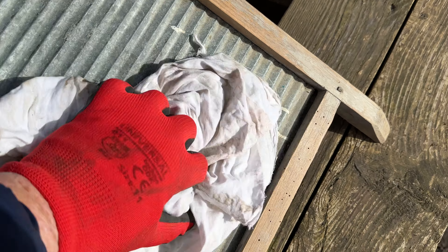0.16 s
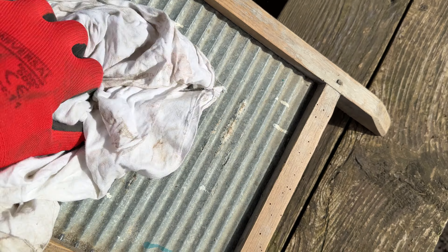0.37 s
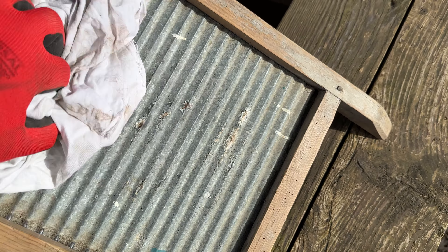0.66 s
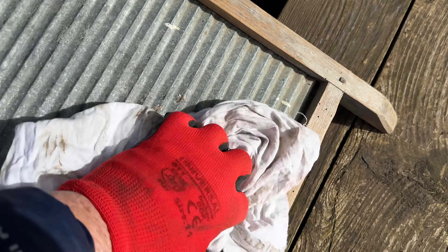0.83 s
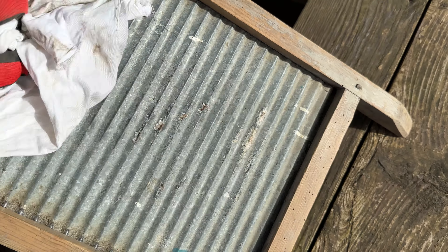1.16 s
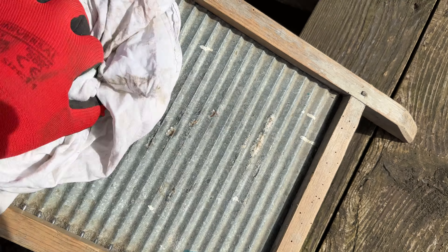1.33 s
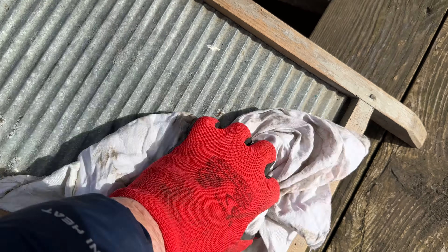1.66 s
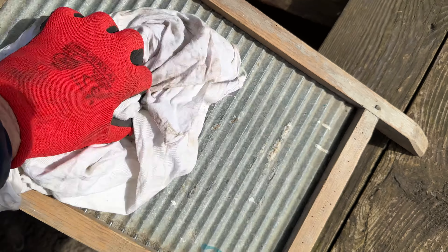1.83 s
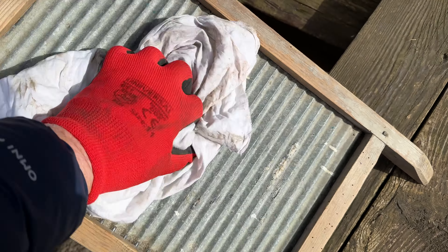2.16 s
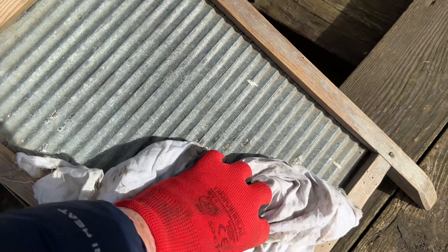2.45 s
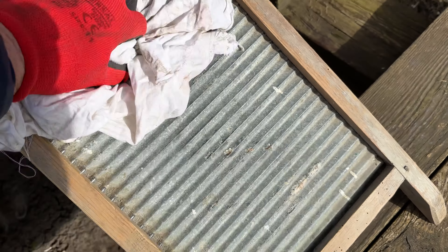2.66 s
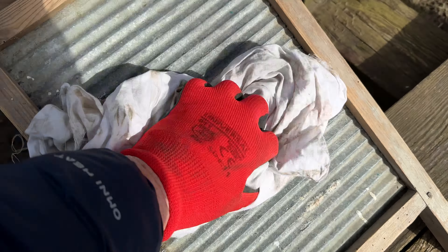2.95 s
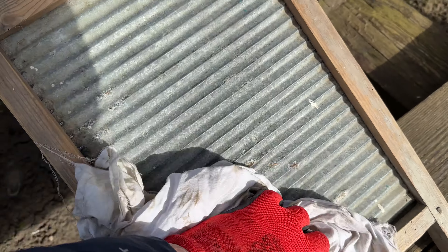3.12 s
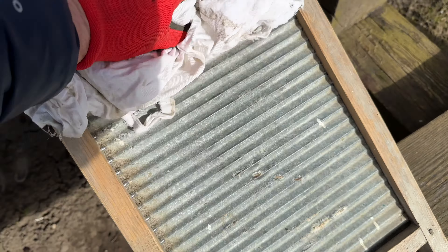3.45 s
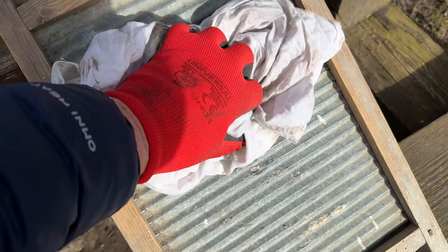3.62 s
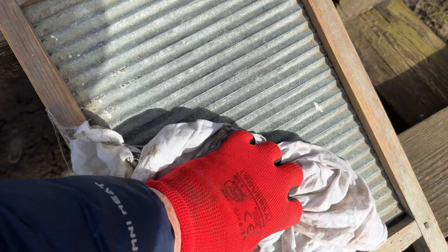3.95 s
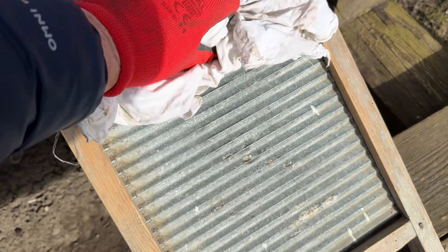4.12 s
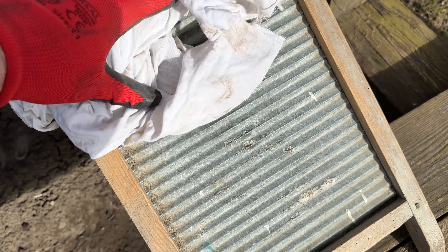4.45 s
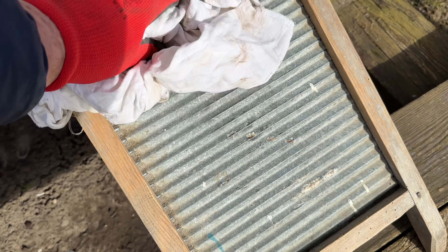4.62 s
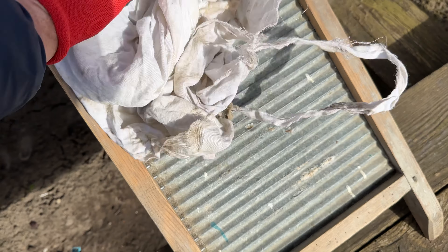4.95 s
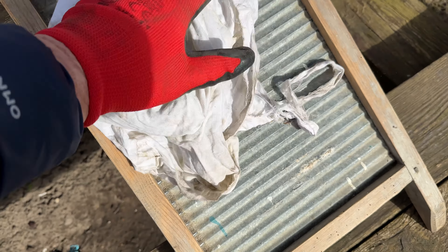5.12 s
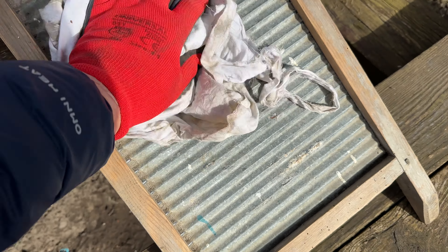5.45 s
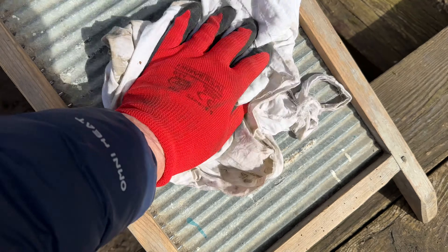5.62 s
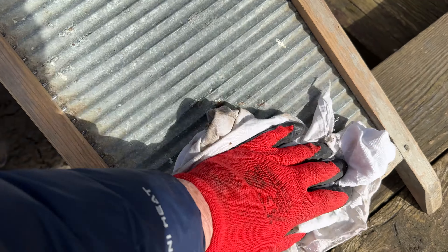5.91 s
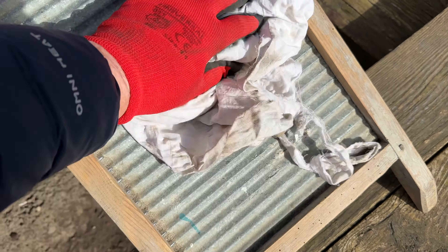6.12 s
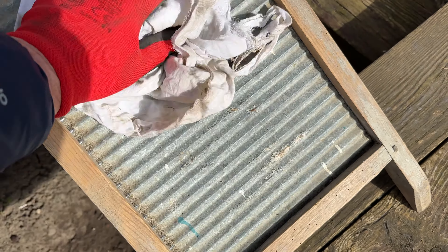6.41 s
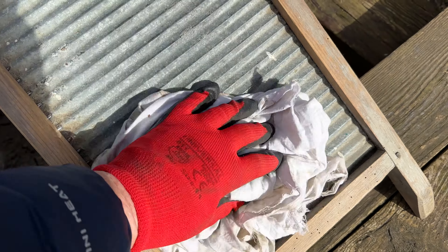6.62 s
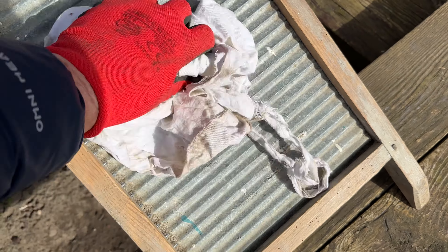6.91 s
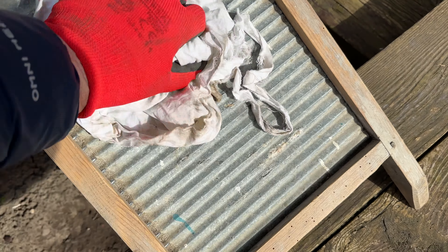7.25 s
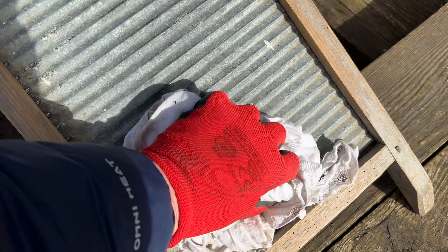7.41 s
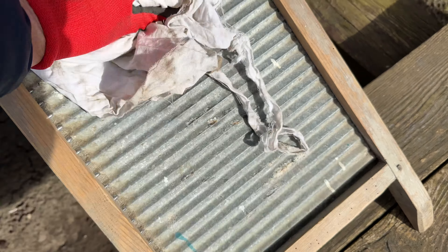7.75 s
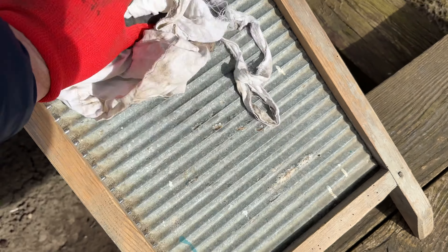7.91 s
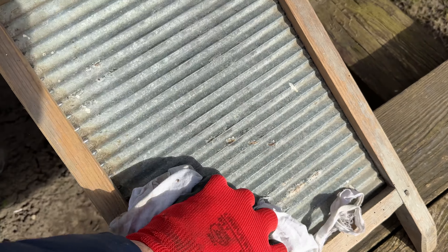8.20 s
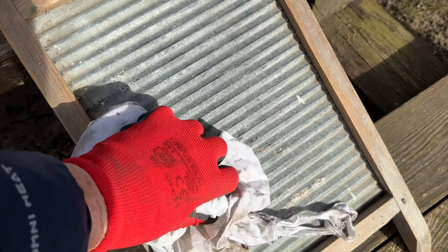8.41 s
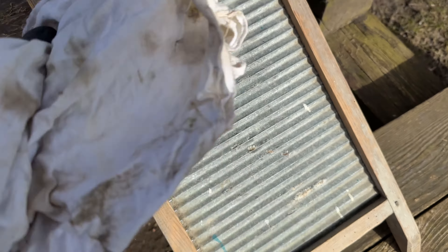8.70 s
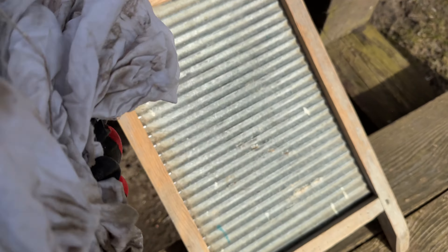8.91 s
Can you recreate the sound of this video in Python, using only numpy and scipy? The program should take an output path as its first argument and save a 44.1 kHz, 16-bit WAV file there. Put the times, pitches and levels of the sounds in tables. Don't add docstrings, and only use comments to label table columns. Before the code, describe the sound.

Outdoors, close to the board, a gloved hand scrubs cloth along corrugated metal in quick alternating strokes, about three a second. Each stroke hisses and purrs over the ridges, with sheet rattles, sharp knocks and low wooden thuds. Midway the rubbing stops for soft flaps and one heavy slap, then scrubbing resumes with small hem ticks and finally fades into quiet air.

```python
import sys
import numpy as np
from scipy import signal
from scipy.fft import rfft, irfft
from scipy.io import wavfile
from scipy.ndimage import uniform_filter1d

SR = 44100
rng = np.random.default_rng(int(sys.argv[2]) if len(sys.argv) > 2 else 0)


def to_wav(sig):
    pcm = np.clip(np.atleast_2d(sig), -1, 1) * 32767
    pcm = np.round(pcm).astype(np.int16)
    wavfile.write(sys.argv[1], SR, pcm.T)


def decibels_to_gain(level_db):
    exponent = np.asarray(level_db, float) / 20
    return 10 ** exponent


N = 399987
T = np.arange(N) / SR

# (start [s], length [s], fibre hiss at mid-stroke [dB], growth over the stroke [dB])
STROKES = [(-0.02, 0.279, -46.9, 2.3), (0.271, 0.283, -50.0, 3.1), (0.55, 0.378, -50.0, 1.1),
           (0.942, 0.312, -50.7, -4.9), (1.284, 0.346, -50.1, 0.6), (1.658, 0.352, -53.6, -3.0),
           (2.034, 0.377, -53.2, 3.7), (2.431, 0.334, -52.8, -0.3), (2.765, 0.377, -51.0, 13.8),
           (3.137, 0.372, -53.3, -2.3), (3.511, 0.391, -52.5, 13.1), (3.915, 0.554, -60.0, -30.1),
           (5.37, 0.56, -49.8, 12.2), (5.937, 0.387, -48.2, 4.8), (6.302, 0.477, -47.1, 3.2),
           (6.756, 0.43, -51.7, -19.6), (7.154, 0.349, -47.5, -0.8), (7.526, 0.362, -47.1, -4.0),
           (7.866, 0.391, -47.1, 6.7)]
# (start [s], length [s], fibre hiss at mid-move [dB], growth over the move [dB])
FOLDS = [(4.363, 0.154, -66.2, -4.1), (4.498, 0.238, -58.7, -26.3), (4.649, 0.336, -59.6, -29.3),
         (4.893, 0.11, -47.0, -16.0), (4.92, 0.434, -63.9, -20.2), (5.21, 0.185, -61.7, 15.6),
         (5.411, 0.055, -53.0, -10.0), (6.335, 0.043, -48.9, -37.2), (8.243, 0.181, -66.0, 21.0),
         (8.38, 0.194, -65.5, 11.2), (8.553, 0.166, -54.1, 1.4), (8.7, 0.18, -66.8, -10.4)]
# (peak [s], rise [s per 20 dB], fall [s per 20 dB], sheet rattle
# [dB], frame rumble [dB])
LEANS = [(0.084, 0.026, 0.144, -27.0, -27.3), (0.462, 0.11, 0.154, -63.8, -37.4),
         (0.702, 0.011, 0.093, -33.3, -26.5), (0.886, 0.187, 0.181, -47.5, -39.5),
         (1.054, 0.085, 0.059, -46.6, -42.3), (1.401, 0.017, 0.236, -30.8, -28.9),
         (1.53, 0.247, 0.088, -52.0, -30.2), (1.861, 0.358, 0.051, -50.7, -46.4),
         (2.276, 0.104, 0.135, -37.5, -31.6), (2.56, 0.082, 0.356, -50.3, -44.4),
         (2.9, 0.008, 0.16, -40.9, -50.8), (3.042, 0.371, 0.209, -47.9, -37.0),
         (3.351, 0.406, 0.317, -50.6, -44.6), (3.73, 0.054, 0.266, -48.0, -38.6),
         (4.123, 0.383, 0.223, -52.7, -51.2), (5.862, 0.344, 0.071, -45.6, -40.5),
         (6.051, 0.199, 0.127, -52.4, -36.8), (6.209, 0.179, 0.115, -32.6, -32.6),
         (6.568, 0.036, 0.286, -45.6, -37.4), (6.877, 0.108, 0.199, -43.8, -40.3),
         (6.974, 0.009, 0.128, -30.6, -31.1), (7.246, 0.021, 0.175, -29.4, -28.3),
         (7.724, 0.221, 0.102, -36.5, -35.6), (8.07, 0.061, 0.155, -30.2, -28.5),
         (0.388, 0.056, 0.1, -60.4, -45.5), (1.669, 0.059, 0.028, -62.7, -44.5),
        (4.441, 0.321, 0.384, -56.9, -51.5), (4.719, 0.122, 0.108, -58.1, -55.1),
        (4.85, 0.043, 0.05, -51.4, -25.2), (4.912, 0.016, 0.116, -28.0, -36.6),
        (5.14, 0.024, 0.174, -49.7, -56.0), (5.251, 0.023, 0.038, -60.0, -46.9),
        (5.442, 0.021, 0.09, -65.4, -49.0), (6.36, 0.029, 0.052, -46.6, -48.8),
        (7.567, 0.052, 0.107, -53.3, -43.8), (8.282, 0.134, 0.031, -65.9, -48.0),
        (8.369, 0.067, 0.162, -56.0, -56.9), (8.911, 0.043, 0.135, -72.0, -44.4),
        (9.008, 0.105, 0.098, -80.0, -53.6)]
# (time [s], rate [ridges per s], unevenness [0-1])
RIDGES = [(0, 70, .74), (1.0, 58, .8), (1.5, 64, .73), (1.75, 54, .72), (2.15, 69, .6), (2.27, 80, .39),
          (2.46, 67, .72), (4.4, 58, .78), (4.85, 73, .73), (5.2, 60, .82), (5.96, 83, .76),
          (6.93, 56, .72), (7.36, 70, .75), (8.44, 57, .77), (9.07, 66, .72)]
# (time [s], peak [dB], brightness [dB])
KNOCKS = [(.064, -14.5, -13), (.079, -20, -14), (.094, -13, -11), (.109, -22, -9.5), (.691, -20, -18),
          (.709, -22, -24), (1.385, -14, -16), (1.402, -13, -21), (1.419, -27, -13), (1.467, -18, -16),
          (2.896, -23.5, -14), (2.91, -18, -29), (4.902, -12.5, -22), (4.917, -17, -12), (4.932, -14, -8),
          (4.954, -17, -13), (6.149, -24, -14), (6.174, -18, -24), (6.217, -19, -22), (6.971, -18.5, -16),
          (7.238, -20, -28), (7.255, -17, -18.5), (7.271, -21, -9.5), (7.286, -12, -24), (7.537, -44, -4),
          (7.688, -19, -19), (8.06, -30, -4), (8.074, -26, -7.5), (8.088, -15, -12.5), (8.183, -26.5, -8)]
# (time [s], peak [dB], pitch [Hz])
THUDS = [(0.075, -22, 126.8), (0.379, -34, 78.1), (0.446, -27, 69.5), (0.53, -29.5, 94),
         (0.82, -25.5, 83.4), (0.965, -30, 78.6), (1.044, -28, 80.7), (1.431, -29, 127), (1.583, -24, 108),
         (1.639, -24.5, 90), (1.732, -38, 97), (2.833, -26.5, 72.8), (3.223, -28, 79.6), (3.725, -33, 69.6),
         (3.938, -29.5, 67.7), (4.837, -23, 145), (4.862, -25, 120.5), (5.433, -40, 78.1),
         (6.029, -26, 138), (6.054, -27, 80.5), (6.171, -33, 78.8), (6.562, -31, 124.3),
         (6.978, -26, 118.7), (7.245, -27, 121.6), (7.615, -31, 99.45), (8.05, -26, 128.3),
         (8.259, -29.5, 86.1), (8.339, -28, 100.3), (8.859, -40.5, 74.8), (9.024, -27.5, 78.6)]
# (time [s], peak [dB], centre [Hz], width [Hz], hold [s])
SNAPS = [
    (4.508, -47.5, 1472, 797, 0.052),
    (4.504, -51, 3290, 700, 0.064),
    (4.902, -25.5, 359.8, 200, 0.031),
    (4.915, -30, 1672, 600, 0.034),
    (5.414, -52.5, 2700, 600, 0.034),
    (5.416, -49, 4970, 3970, 0.029),
    (6.335, -41, 4850, 5010, .018),
    (6.373, -48.5, 2914, 700, .06),
    (8.208, -47.5, 1897, 793, 0.047),
    (8.204, -50, 3400, 900, .048),
]
# (first tick [s], last tick [s], first gap [ms], last gap [ms], level [dB], centre [Hz])
HEM = [
    (6.446, 6.695, 16.8, 14.3, -38, 2840),
    (6.822, 6.92, 11, 9.6, -41.5, 3897),
    (7.593, 7.7, 14.8, 13.3, -34, 1998),
]
# (time [s], topmost band against the hiss [dB])
SHINE = [
    (0, 1.5),
    (4.16, 1.5),
    (4.28, 0),
    (4.9, -7),
    (5.28, -2),
    (5.48, 0.5),
    (6.9, 0.5),
    (8.22, 1.5),
    (8.32, -4.5),
    (9.07, -4),
]
# (frequency [Hz], density [dB per Hz])
HISS = [(150, -24), (250, -5), (547, -5.5), (651, -5), (802, -6.5), (1080, -5.5), (1220, -6.5),
        (1760, -8.5), (3230, -10), (3910, -9.5), (6470, -13.5), (9490, -10), (11300, -22), (15200, -13),
        (16000, -18)]
# (centre [Hz], width [Hz], level [dB])
ZINC = [(628, 45, 0), (3810, 130, -7), (4960, 170, -9), (5910, 150, -10), (6740, 360, -10), (7620, 45, -11)]
# (frequency [Hz], density [dB per Hz])
RATTLE = [(180, -40.5), (300, -4), (734, -2), (1130, -1), (1360, -10), (1660, -9), (2410, -13), (2730, -13),
          (3180, -19), (3770, -17.5), (4610, -24.5), (12000, -58), (15600, -32), (22000, -120)]
# (centre [Hz], width [Hz], level [dB])
SHEET = [(673, 410, 0), (1147, 15, -4), (1717, 330, -8), (2670, 150, -9), (3240, 21, -15), (3610, 150, -14),
         (4500, 38, -20), (4630, 54, -22), (4830, 180, -21), (5600, 31, -24), (5910, 390, -23)]
# (frequency [Hz], density [dB per Hz])
RUMBLE = [(15, -26), (25, -25), (49, -10.5), (70, 0), (92, -4), (124, -3.5), (170, -4.5), (235, -11.5),
          (307, -22), (500, -18), (650, -60), (1100, -120)]
# (frequency [Hz], density [dB per Hz])
AIR = [(24, -26), (40, -4), (95, 8), (233, -6), (340, 1.5), (461, -12), (1000, -13), (1680, -6),
       (2030, -11), (9330, -17.5), (11000, -27), (14300, -58), (22000, -120)]

AIR_DB = -62
LULL_S, LULL_LENGTH_S, LULL_DB = 8.85, .15, -6
STROKE_POWER, FOLD_POWER, STILL_DB = .83, .56, -80
GLIDE_RATTLE_DB, GLIDE_RUMBLE_DB, FOLD_RUMBLE_DB = -0.9, -3.5, -12
FRAME_LAG_S, FRAME_RISE_S, FRAME_FALL = .01, .026, 1.1
SLOW_DB, SHEET_STILLS, FRAME_STILLS = -56.4, .28, .26
KNOCK_T60_S = .049


def noise():
    return rng.standard_normal(N)


def level(x, db):
    return x * decibels_to_gain(db) / np.sqrt(np.mean(x ** 2))


def colour(x, points):
    size = 8192
    hz, db = np.transpose(points)
    bins_hz = np.arange(size // 2 + 1) * SR / size
    gain = np.interp(np.log(bins_hz + 1), np.log(hz), db) * np.log(10) / 20
    cep = irfft(gain)
    cep[1:size // 2] *= 2
    cep[size // 2 + 1:] = 0
    impulse = irfft(np.exp(rfft(cep)))[:size // 2]
    return signal.fftconvolve(x, impulse)[:N]


def ring(x, hz, width):
    return signal.lfilter(*signal.iirpeak(hz, hz / width, SR), x)


def walk(rate):
    k = int(SR / rate)
    steps = np.repeat(rng.standard_normal(N // k + 1), k)
    return 1.3 * uniform_filter1d(uniform_filter1d(steps, k), k)[:N]


def along(table):
    s, *columns = np.transpose(table)
    return [np.interp(T, s, c) for c in columns]


def bursts(times, db, t60):
    out, t = np.zeros(N + SR), T[:SR // 4]
    for s, gain, ring_s in zip(times, decibels_to_gain(db), t60):
        i = int(s * SR)
        out[i:i + len(t)] += gain * np.exp(-np.log(1000) * t / max(ring_s, .01))
    return out[:N]


def add_db(*levels):
    return 10 * np.log10(sum(decibels_to_gain(2 * db) for db in levels))


def air():
    lull_db = LULL_DB * np.clip((T - LULL_S) / LULL_LENGTH_S, 0, 1)
    return level(colour(noise(), AIR), AIR_DB) * decibels_to_gain(0.84 * walk(1.5) + lull_db)


def sliding(moves, power):
    total = decibels_to_gain(2 * STILL_DB)
    for s, length, db, growth_db in moves:
        share = np.clip((T - s) / length, 0, 1)
        speed = np.abs(np.sin(np.pi * share))
        total = total + decibels_to_gain(2 * (db + growth_db * (share - .5))) * speed ** (2 * power)
    return 10 * np.log10(total)


def ridges():
    hz, uneven = along(RIDGES)
    uneven = np.clip(uneven, 0, 1)
    turns = np.cumsum(hz * np.exp(.25 * uneven ** 2 * walk(45))) / SR
    bump_db = 2.4 * uneven * rng.standard_normal(N // 100)[turns.astype(int)]
    return turns % 1, bump_db, uneven


def fibres(phase, db):
    ticks = (rng.random(N) < 1500 / SR) * decibels_to_gain(1.0 * rng.exponential(size=N)) * noise()
    x = colour(noise() + level(ticks, -9), HISS) * (1 + 0.12 * np.exp(-phase / .3))
    x = x + decibels_to_gain(-6.0) * sum(ring(x, hz, width) * decibels_to_gain(2.7 * walk(9)) for hz, width, _ in ZINC)
    patches_hz = np.geomspace(500, 15000, num=20)
    x = x + sum(ring(x, hz, 0.14 * hz) * (decibels_to_gain(2.23 * walk(22)) - 1) for hz in patches_hz)
    low = signal.sosfiltfilt(signal.butter(1, 2600, fs=SR, output="sos"), x)
    top = signal.sosfiltfilt(signal.butter(4, 11800, "high", fs=SR, output="sos"), x)
    shine_db = along(SHINE)[0]
    top_db = shine_db + 0.1 * (db + 53) + 1.1 * walk(5.6)
    low_db = .4 * shine_db + 1.4 * walk(14)
    x = x + low * (decibels_to_gain(low_db) - 1) + top * (decibels_to_gain(top_db) - 1)
    return level(x, 2.3) * decibels_to_gain(0.88 * (db + 57) - 54 + 1.0 * walk(30))


def leaning():
    def tent(s, rise, fall, db):
        return db - 20 * np.maximum((s - T) / rise, (T - s) / fall)

    rattles, rumbles = [], []
    for s, rise, fall, rattle_db, rumble_db in LEANS:
        rattles.append(tent(s, rise, fall, rattle_db))
        slow_rise = np.hypot(rise, FRAME_RISE_S)
        rumbles.append(tent(s + FRAME_LAG_S, slow_rise, FRAME_FALL * fall, rumble_db))
    return add_db(*rattles), add_db(*rumbles)


def sheet(x, ring_db):
    x = colour(x, RATTLE)
    modes = sum(decibels_to_gain(0.17 * db) * ring(x, hz, 0.39 * width) for hz, width, db in SHEET)
    return x + decibels_to_gain(ring_db) * modes


def rattle(phase, bump_db, db, hiss_db):
    shake = noise() * decibels_to_gain(bump_db) * (0.58 + np.exp(-phase / 0.54))
    over = np.sqrt(np.clip(decibels_to_gain(2 * db) - decibels_to_gain(2 * (hiss_db - 1.0)), 1e-12, 1))
    return level(sheet(shake, 1.5), -0.43) * over


def frame(phase, bump_db, uneven, db):
    push = colour(decibels_to_gain(0.37 * bump_db) * np.exp(-phase / 0.079), RUMBLE)
    blur = colour(noise() * decibels_to_gain(3.5 * walk(25)), RUMBLE)
    share = np.clip(1.07 * uneven - .2, 0, 1)
    out = decibels_to_gain(db) * (np.sqrt(1 - share) * level(push, -0.34) + np.sqrt(share) * level(blur, -0.18))
    t = T[:SR // 10]
    swing = t / 0.0049 * np.exp(1 - t / 0.0054)
    for s, peak_db, hz in THUDS:
        i = int(s * SR)
        overtone = 0.2 * np.sin(2 * np.pi * 2.29 * hz * t) * np.exp(-t / 0.016)
        thud = decibels_to_gain(peak_db - 4.0) * (np.sin(2 * np.pi * hz * t) + overtone) * swing
        out[i:i + len(t)] += thud[:N - i]
    return out


def knocks():
    s, db, bright_db = np.transpose(KNOCKS)
    t60 = np.full(len(s), KNOCK_T60_S)
    grit = np.sign(noise())
    unit = np.std(sheet(grit, 11.2))
    grit[(s * SR).astype(int)] = 8.6
    dull = sheet(grit * bursts(s, db, t60), 0.83) / unit
    bright = sheet(grit * bursts(s, db + bright_db, t60), 2.0) / unit
    split_hz = 1900
    dull = signal.sosfilt(signal.butter(2, [400, split_hz], "band", fs=SR, output="sos"), dull)
    bright = signal.sosfilt(signal.butter(2, split_hz, "high", fs=SR, output="sos"), bright)
    return decibels_to_gain(-6.0) * dull + decibels_to_gain(14.5) * bright


def snaps():
    out = np.zeros(N)
    for s, db, hz, width, hold in SNAPS:
        attack = np.clip((T - s) * hz / 6.0, 0, 1)
        fade = np.exp(-(np.maximum(T - s, 0) / hold) ** 3)
        out += level(ring(ring(noise(), hz, width), hz, width), db) * attack * fade
    return out


def hem():
    out = np.zeros(N)
    for start, end, gap_ms, last_ms, db, hz in HEM:
        count = 1 + int((end - start) / (gap_ms + last_ms) * 2000)
        gaps_ms = np.linspace(gap_ms, last_ms, count - 1)
        times = start + np.cumsum(np.r_[0, gaps_ms]) / 1000
        ticks_db = db + 1.58 * rng.standard_normal(32)[:count]
        out += level(ring(noise(), hz, 0.71 * hz), 0) * bursts(times, ticks_db, np.full(count, .009))
    return out


def scene():
    scrub_db = sliding(STROKES, STROKE_POWER)
    fold_db = sliding(FOLDS, FOLD_POWER)
    hiss_db = add_db(scrub_db, fold_db)
    slow_db = np.minimum(hiss_db - SLOW_DB, 0)
    rattle_db, rumble_db = leaning()
    rattle_db = add_db(rattle_db + SHEET_STILLS * slow_db, hiss_db + GLIDE_RATTLE_DB)
    rumble_db = add_db(rumble_db + FRAME_STILLS * slow_db,
                       scrub_db + GLIDE_RUMBLE_DB, fold_db + FOLD_RUMBLE_DB)
    phase, bump_db, uneven = ridges()
    board = rattle(phase, bump_db, rattle_db, hiss_db) + frame(phase, bump_db, uneven, rumble_db) + knocks()
    cloth = fibres(phase, hiss_db) + snaps() + hem()
    return (air() + cloth + board)[None]


def band_limit(x):
    return signal.sosfilt(signal.butter(12, 16500, fs=SR, output="sos"), x)


def record(dry):
    x = signal.sosfilt(signal.butter(5, 44, "high", fs=SR, output="sos"), dry)
    x = signal.sosfilt(signal.ellip(10, .2, 80, 15750, fs=SR, output="sos"), x)
    return band_limit(x)


dry = scene()
out = record(dry)
to_wav(out)
```